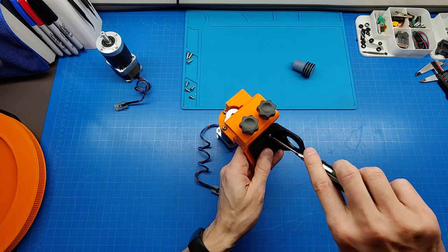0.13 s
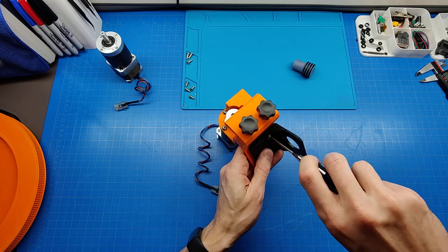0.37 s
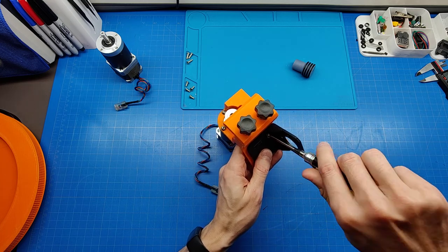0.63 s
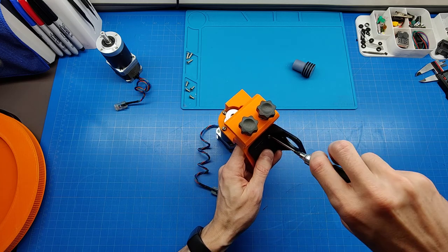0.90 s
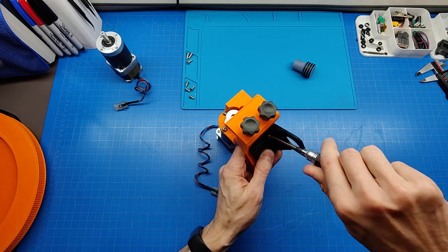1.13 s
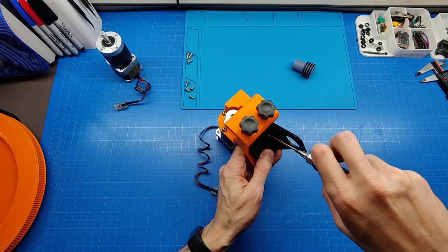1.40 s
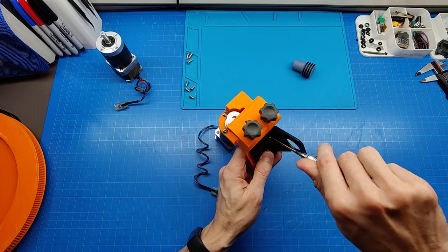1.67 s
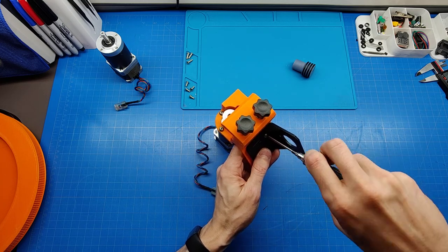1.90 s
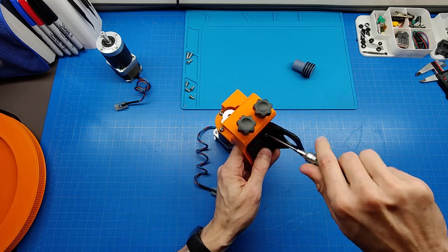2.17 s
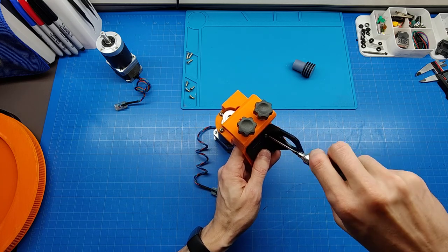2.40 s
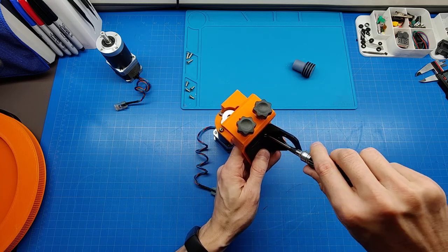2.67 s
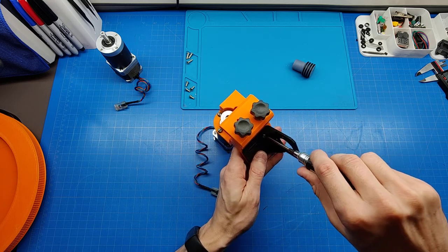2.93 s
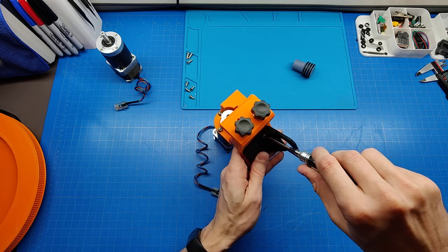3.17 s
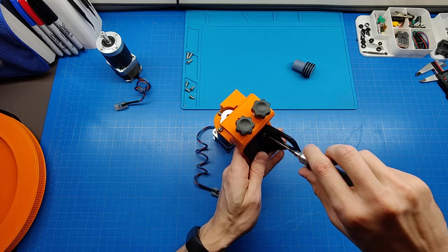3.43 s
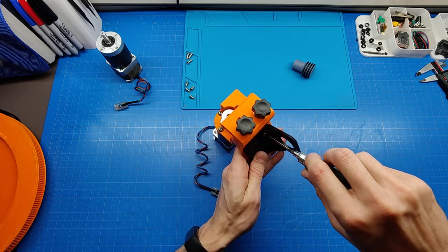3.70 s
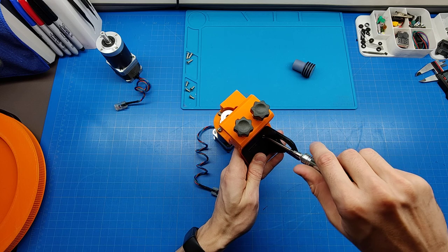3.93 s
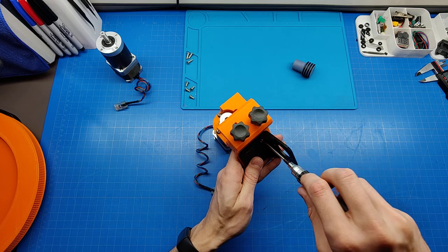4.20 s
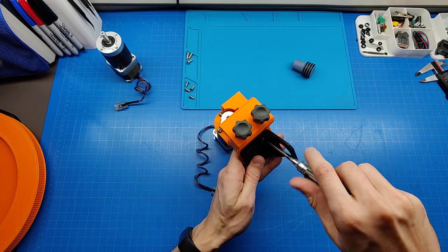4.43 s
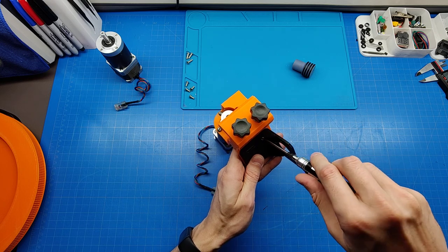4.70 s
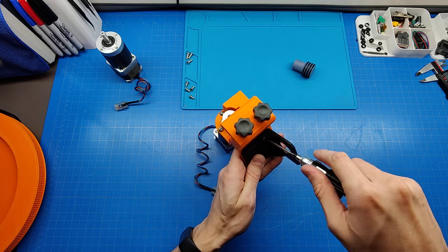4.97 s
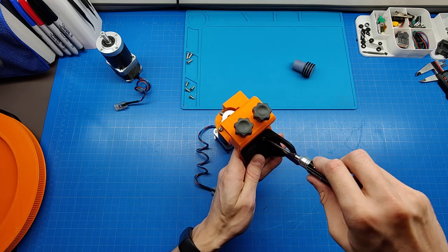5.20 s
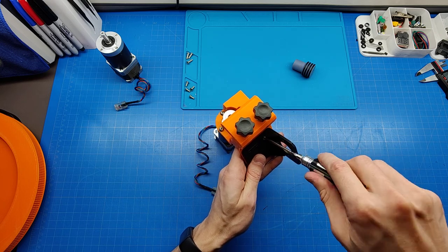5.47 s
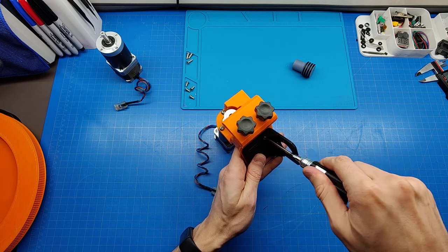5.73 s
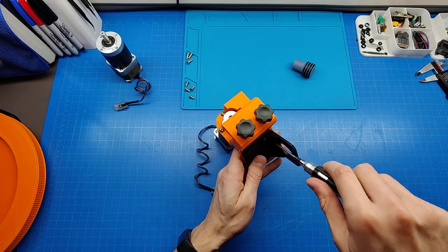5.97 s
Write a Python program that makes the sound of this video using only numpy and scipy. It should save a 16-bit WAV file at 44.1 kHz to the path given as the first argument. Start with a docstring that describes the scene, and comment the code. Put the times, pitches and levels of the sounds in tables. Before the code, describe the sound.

Tiny gritty ticks of a driver bit ring briefly through hollow plastic, mixed with very faint finger rubbing and dry skin hiss. An early snap leans left and stands out; the heaviest muffled bench thumps follow at about two seconds. The rest is calmer, scattered clicking, ending on two brighter clicks. Stereo microphone clamped to the bench, short room reflections, faint low room tone.

```python
"""A small screwdriver turns screws into a plastic part held on a workbench: its bit clicks in the screw head,
each click a burst of chatter ringing through the plastic. The part knocks on the bench top and sets its modes
swinging; fingers rub the plastic as noise through the same rings, and dry skin hisses on the handle.
A small quiet room answers with sparse fading taps, over a faint tone of its own.
A two-capsule microphone is clamped to the bench."""
import sys
import numpy as np
from scipy import signal
from scipy.io import wavfile
from scipy.ndimage import uniform_filter1d

SR = 44100
rng = np.random.default_rng(int(sys.argv[2]) if len(sys.argv) > 2 else 0)


def to_linear_factor(level_db):
    """Convert decibel levels (scalar or array-like) to linear amplitude factors."""
    exponent = np.asarray(level_db, float) / 20
    return 10 ** exponent


def inscribe(sig):
    """Save sig as 16-bit PCM at rate SR to the path in sys.argv[1].

    A 1-D sig is mono; a 2-D sig holds one channel per row.
    Samples are clipped to [-1, 1] before scaling.
    """
    pcm = np.round(np.clip(np.atleast_2d(sig).T, -1, 1) * 32767)
    wavfile.write(sys.argv[1], SR, pcm.astype(np.int16))


N = 269010  # length [samples]

# Turns of the driver, fingers rubbing the plastic and pressing the part on the bench:
# (time of most effort [s], half length [s], rub level [dB], bright level against rub [dB], press level [dB])
STROKES = [(0.0, 0.084, -59.5, 5, -48.5), (0.213, 0.26, -86, 6, -53), (0.384, 0.12, -79.5, 6.5, -64),
           (0.77, 0.32, -77.5, 0, -58.5), (1.294, .1, -62, -2, -45), (1.444, 0.2, -73, -4, -61),
           (1.68, 0.2, -80.5, 7, -60), (1.806, .12, -70, -1, -65), (2.033, 0.094, -62, -6, -48),
           (2.22, 0.23, -62.5, -4, -39), (2.35, 0.12, -67, -4, -66), (2.44, 0.23, -65.5, -12, -53.5),
           (3.041, 0.11, -63, -9, -51), (3.2, 0.083, -71, -10, -47), (3.296, 0.098, -66.5, -15.5, -52),
           (3.634, 0.16, -98, -15, -66), (3.732, 0.26, -76, -5.5, -60), (4.307, 0.4, -82, -0.5, -62.5),
           (4.42, 0.15, -74, -1, -68), (4.762, 0.17, -72.5, -2.5, -55.5), (5.304, 0.069, -70.5, -12, -49),
           (6.065, .15, -75.5, -5.5, -58)]
# Dry skin sliding on the handle: (time of most hiss [s], half length [s], level [dB])
SKIN_SLIDES = [(0.0, 0.054, -62.5), (0.284, .06, -71), (0.412, .06, -67), (0.72, .07, -72),
               (0.93, .05, -75), (1.25, 0.069, -62), (1.44, .06, -81), (1.73, 0.091, -65), (1.86, .06, -77),
               (1.998, .06, -62), (2.16, .06, -65), (2.21, .08, -63), (2.76, .08, -72), (3.01, .06, -71),
               (5.33, 0.077, -73), (6.0, .06, -68)]
# Rings of the plastic part, in body, wall, bright and top groups:
# (centre [Hz], width between the -9 dB points [Hz], level [dB])
PART_RINGS = [
    [(900, 1100, -5), (1310, 233, -0.5), (2434, 2330, 4)],
    [(3610, 1700, 1.5), (4256, 2400, 9), (5240, 3200, 4.5)],
    [(6970, 2000, -3.5), (7414, 2020, -5), (9670, 1680, -15)],
    [(13450, 3500, 10), (16140, 4570, 7.5), (10300, 3400, 9.5)],
]
# Narrow rings that rubbing favours, in the same four groups: (centre [Hz], width [Hz], level [dB])
RUB_RINGS = [
    [(2300, 500, 7)],
    [(4210, 550, 13.5)],
    [],
    [],
]
# The part knocking on the bench; levels add to that of the strongest mode in each bench group:
# (time [s], boom level [dB], middle level against boom [dB], upper level against boom [dB])
KNOCKS = [(0.004, -54.5, 3.5, -15), (0.043, -46.5, -6.5, -19), (0.137, -42.5, -16, -18),
          (0.199, -62.5, -9, 12.5), (0.237, -59.5, 9.5, -20), (0.397, -51, -13, -3), (0.557, -55, -11, -44),
          (0.749, -52, -1.5, -1), (0.797, -41, -7.5, -11.5), (0.848, -48, -11, -9),
          (0.964, -49, -21, -18.5), (1.06, -49, -10, -15.5), (1.232, -38.5, 4, 7),
          (1.304, -36.5, -14, -8.5), (1.431, -51.5, 0.5, -6), (1.458, -36, -18, -23),
          (1.602, -34, -14.5, -20.5), (1.711, -53, -0.5, 1), (1.743, -29, -11, -20),
          (1.788, -37.5, -13.5, -18.5), (1.826, -44, -3.5, -8.5), (1.981, -19, -4.5, -10),
          (2.039, -23, -6, -10), (2.086, -44.5, -2, 0.5), (2.178, -24, -8.5, -14.5),
          (2.221, -34.5, -3.5, -10.5), (2.3, -36, -11.5, -8), (2.349, -55.5, -4.5, 2),
          (2.422, -42, -34, -11), (2.582, -35, -21, -18.5), (2.94, -45.5, -17, -30),
          (2.975, -37.5, -7.5, -8.5), (2.997, -44, -4.5, -2.5), (3.049, -58, -11, 0),
          (3.181, -32.5, -12, -29), (3.216, -45, -11, -6), (3.27, -45, -5, -6.5), (3.309, -59, 10.5, 5.5),
          (3.578, -67, 2, -22), (3.697, -40, -20, -17.5), (3.758, -57.5, -35, -4),
          (3.846, -52.5, -4.5, -19.5), (3.943, -51, -27, -14), (4.203, -50.5, -7, -8.5),
          (4.27, -58.5, -7.5, -0.5), (4.372, -52, -29, -13), (4.72, -51.5, -23, -17),
          (4.742, -38.5, -32, -17.5), (4.807, -49, -15.5, -5.5), (4.884, -46.5, -19.5, -20.5),
          (5.1, -49.5, -35, -23), (5.148, -56, -37, -31), (5.245, -43.5, -30, -34),
          (5.31, -28.5, -12, -23.5), (5.991, -51, -12, -21), (6.063, -40.5, -33, -38)]
# Bench-top modes before detuning, in boom, middle and upper groups: (frequency [Hz], level [dB], t60 [s])
BENCH_MODES = [
    [(38.7, -16.5, 0.36), (57, -18.5, .15), (88.4, -4, 0.079), (111, 1, 0.2), (120.6, 0.5, 0.087),
     (163.5, -5, 0.2), (192.8, -13.5, 0.17)],
    [(249.6, 3.5, 0.17), (222.5, -13, 0.25), (303.4, -11.5, 0.22)],
    [(395.5, -2.5, 0.2), (460, 2.5, 0.11), (554, -5.5, 0.15), (667, -18.5, 0.194), (853, -24.5, 0.19),
     (1055, -13, 0.038), (1296, -31, 0.11), (1611, -24, 0.1)],
]
# Spectrum of the room tone, only its shape: (frequency [Hz], relative level per Hz [dB])
ROOM_TONE = [(15, -35), (25, 0.5), (172, -0.5), (220, -13), (280, -4.5), (524, -6), (651, -13.5),
             (809, -11.5), (1150, -18.5), (1830, -19), (5570, -39.5), (7510, -32), (8830, -34),
             (15200, -25.5), (16500, -26.5)]
# Left-right likeness of the room tone: (frequency [Hz], correlation [0 to 1])
TONE_LIKENESS = [(60, 0.99), (180, 0.96), (550, 0.9), (1650, 0.063), (4970, 0.072), (15000, 0.23)]
# Bit clicking in the screw head; levels add to that of the strongest ring in each part group:
# (time [s], bright level [dB], body level against it [dB], pitch of the spot hit [Hz], top level against it [dB])
CLICKS = [(0.0044, -44, -12.5, 1650, -21), (0.0367, -54, -6, 2600, -30), (0.1685, -65.5, 8, 2200, -32),
          (0.197, -61, 1, 2200, -35), (0.2335, -67, 8, 2400, -27), (0.2752, -39.5, -20.5, 2380, -13.5),
          (0.398, -38, -12.5, 2150, -16.5), (0.401, -60.5, 10.5, 4750, -20), (0.545, -47.5, -38, 1230, -33),
          (0.5738, -46, -23, 2710, -31), (0.68, -48, -28, 2850, -29), (0.6973, -46, -17, 1710, -21),
          (0.7453, -47, -16.5, 2720, -25), (0.7901, -48.5, -15, 1820, -31), (0.811, -57, -6, 2140, -28),
          (0.8254, -54.5, -5.5, 2050, -27), (0.8737, -46.5, -19, 1550, -21), (0.8955, -45, -18, 1700, -23),
          (0.9096, -49.5, -20.5, 1320, -16.5), (1.074, -48.5, -19, 1800, -20), (1.1, -50, -13.5, 2550, -22),
          (1.2308, -34, -8, 2300, -4.5), (1.2327, -18, -19, 1310, -28), (1.2376, -25, -16.5, 806, -22),
          (1.369, -48.5, -7.5, 2060, -33), (1.416, -47.5, -10, 2900, -26),
          (1.4317, -37.5, -14.5, 2180, -22), (1.478, -57, 4.5, 2290, -48), (1.586, -39, -17, 2360, -40),
          (1.6092, -51, -10, 1310, -24), (1.6716, -52, -27, 1990, -29), (1.698, -63, 4, 2110, -7),
          (1.736, -44, -18, 1120, -5.5), (1.7515, -44, -9, 4530, -20), (1.798, -39.5, -15, 2650, -12),
          (1.8293, -43, -7, 2840, -22), (1.8498, -34.5, -13, 3550, -17), (1.9825, -43, -7, 1170, -23),
          (1.9909, -34, -10, 2220, -18), (2.0404, -42.5, -8, 1050, -34), (2.0815, -60.5, 9, 2050, -22),
          (2.1093, -34.5, -14.5, 3580, -22), (2.149, -38.5, -24, 2200, -13.5),
          (2.178, -48.5, -1, 2120, -29), (2.1996, -34, -13.5, 1350, -18.5), (2.3, -46.5, -5.5, 2070, -23),
          (2.3221, -42, -6, 2460, -21), (2.3496, -46, -4, 2510, -16), (2.4542, -58, -5.5, 2260, -24),
          (2.4932, -39.5, -12.5, 2470, -25), (2.5448, -54.5, -20, 2225, -20), (2.5765, -52, -17, 2350, -37),
          (2.465, -60.5, 5, 3670, -30), (2.6052, -66.5, 5.5, 2205, -30), (2.7367, -69.5, 0.5, 1770, 1),
          (2.763, -56, -14.5, 1320, -14), (2.802, -54, -3, 2330, -11), (2.886, -52, -32, 1540, -19),
          (2.9107, -52, -22, 1690, -33), (2.9651, -56, 3, 2330, -37), (2.9724, -53, 6, 2430, -33.5),
          (2.9916, -36, -4.5, 2230, -23), (3.1633, -66, 10, 2400, -32), (3.2111, -46.5, 0.5, 2547, -29),
          (3.2202, -48.5, 0, 1720, -39), (3.2852, -47.5, -2, 2520, -24), (3.2946, -50, -5.5, 2170, -23.5),
          (3.5584, -40, -23.5, 1275, -21.5), (3.6527, -47.5, -23, 1290, -19),
          (3.685, -41, -16.5, 2440, -13.5), (3.7437, -66, 8.5, 2340, -32), (4.1387, -45, -20.5, 1830, -20),
          (4.156, -52.5, -5.5, 2300, -32), (4.2037, -46.5, -8, 3040, -16.5), (4.2124, -53.5, -7, 2630, -17),
          (4.2782, -48, -13, 2800, -15), (4.356, -43.5, -9, 1260, -41), (4.3737, -43, -19, 1290, -25),
          (4.405, -55, -6, 2690, -16), (4.437, -58, -7.5, 2440, -37), (4.5516, -49, -15.5, 2050, -33),
          (4.6853, -53.5, -12.5, 2470, -25), (4.759, -44, -7, 2560, -23), (4.812, -59, -3.5, 2550, -26),
          (4.8948, -67, 9.5, 2540, -22), (4.947, -67.5, 3, 2310, -40.5), (5.137, -44, -19.5, 3100, -27),
          (5.1552, -35.5, -21.5, 1720, -34), (5.2608, -39.5, -18.5, 1840, -24),
          (5.2853, -44.5, -12.5, 2080, -18), (5.3106, -61, 8, 2500, -8), (5.3259, -42, -11.5, 5380, -11),
          (5.985, -28, -30, 2400, -22), (6.065, -32.5, -25, 3100, -18)]
# The hand shading one capsule or the other from the bright part: (time [s], left over right [dB])
HAND_SHADE = [(0.0, 0.), (0.68, -2), (1.17, 1), (1.26, 13.5), (1.51, 0.), (1.6, -8), (1.8, -2), (2.36, -.5),
              (5.05, 1), (5.18, 8.5), (5.3, 2.5), (6.1, -2)]
# Decay of the room: (frequency [Hz], t60 [s])
ROOM_DECAY = [(200, 0.18), (700, 0.34), (2500, 0.29), (7000, 0.3), (14000, 0.24)]


def evened(x):
    """Scales to rms 1."""
    return x / np.sqrt(np.mean(x ** 2) + 1e-20)


def read(points, hz):
    """Reads a spectrum on a log frequency axis."""
    f, value = np.transpose(points)
    return np.interp(np.log(hz + 1), np.log(f + 1), value)


def add(mix, s, sound):
    """Mixes a sound in at s seconds."""
    part = mix[..., max(round(s * SR), 0):][..., :sound.shape[-1]]
    part += sound[..., :part.shape[-1]]


def efforts(at_s, peak_db, rise_db_per_s, fall_db_per_s, rest_db):
    """Gain for every sample: peaks with straight flanks in dB, their powers added to a resting level."""
    t = np.arange(0, N + 64, 64) / SR
    late = t - np.reshape(at_s, (-1, 1))
    flank_db = np.where(late > 0, late * np.c_[fall_db_per_s], -late * np.c_[rise_db_per_s])
    power = to_linear_factor(2 * (np.c_[peak_db] - flank_db)).sum(0) + to_linear_factor(2 * rest_db)
    return np.interp(np.arange(N) / SR, t, np.sqrt(power))


def strokes(peak_db, rest_db):
    """The strokes' common swell and fade, at the given peak levels."""
    s, half = np.transpose(STROKES)[:2]
    rise_db, fall_db = 16.5, 16.5  # change over a half length
    return efforts(s, peak_db, rise_db / half, fall_db / half, rest_db)


def ring(x, modes, size=2048):
    """Passes x through the resonances: their powers add, and the phase is the causal minimum one."""
    hz = abs(np.fft.fftfreq(size, 1 / SR))
    power = sum(to_linear_factor(2 * db) / (1 + (2 * (hz - centre_hz) / width) ** 2) ** 3
                for centre_hz, width, db in modes)
    spectrum = np.exp(np.conj(signal.hilbert(np.log(power) / 2)))
    taps = np.fft.ifft(spectrum).real
    return signal.oaconvolve(x, taps[:size // 2])[:len(x)]


def slip_grip(slips_per_s=300, spread_db=4.5):
    """Skin sticks and lets go in tiny slips of uneven size, at random moments."""
    size = to_linear_factor(spread_db * np.minimum(rng.exponential(1, N), 3))
    slips = size * (rng.random(N) < slips_per_s / SR)
    return evened(uniform_filter1d(slips, 30))  # each slip lasts under a millisecond


def skin_slide():
    """Level of dry skin sliding on the handle: quick swells that fade more slowly."""
    s, half, db = np.transpose(SKIN_SLIDES)
    return efforts(s, db, 40 / half, 18 / half, -92)  # 40 dB up, 18 dB down over a half length


def rub():
    """Slips roughen a fine hiss that rings the part; the top group, skin on the handle, is mostly hiss."""
    grip = slip_grip()
    rub_db, bright_db = np.transpose(STROKES)[2:4]
    rest_db = -94.0
    wall_db = rub_db - 4 - 0.18 * bright_db  # dull strokes carry more of the wall group
    levels = [strokes(rub_db, rest_db), strokes(wall_db, rest_db),
              strokes(rub_db + bright_db, rest_db), skin_slide()]
    roughness = (1.6, 1.5, 0.9, 0.4)
    out = []
    for level, modes, favoured, rough in zip(levels, PART_RINGS, RUB_RINGS, roughness):
        hiss = (1 + rough * grip) * rng.standard_normal(N)
        out.append(level * evened(ring(hiss, modes + favoured)))
    return np.array(out)


def bench_swings(modes, rise_s, wait, strength, detune=0.034):
    """Soft pushes into one group of bench modes, each decaying and bouncing once; one row per push."""
    t = np.arange(SR // 3) / SR
    hz, db, t60 = np.transpose(modes)[:, None, :, None]
    # where a knock lands and how the hands lean shift the modes a little
    shift = rng.standard_normal((len(wait), len(modes), 1))
    decay = to_linear_factor(db - 60 * t / t60)
    swing = (decay * np.sin(2 * np.pi * hz * (1 + detune * shift) * t)).sum(1)
    swing *= (1 - np.exp(-t / rise_s)) ** 2  # the rubber mat softens the landing
    swing += [size * np.r_[np.zeros(late), one[:-late]] for one, late, size in zip(swing, wait, strength)]
    return swing * to_linear_factor(db.max()) / abs(swing).max(1, keepdims=True)


def hand_press(lumps, swing):
    """Lumpy noise from the pressing hands stirs the bench modes, swelling with each stroke."""
    press = strokes(np.transpose(STROKES)[4], -77.5)
    return press * evened(signal.fftconvolve(lumps, swing)[:N])


def bench():
    """Knocks and pressing hands set the bench top swinging, in boom, middle and upper groups."""
    unevenness = evened(uniform_filter1d(rng.standard_normal(N), 900))
    lumps = rng.standard_normal(N) * to_linear_factor(2.4 * unevenness)
    pushes = len(KNOCKS) + 1  # the last one serves the pressing hands
    # the part bounces once more on its other edge
    wait = (SR * (0.007783 + 0.01591 * rng.random(pushes))).astype(int)
    strength = 0.17 + 0.57 * rng.random(pushes)
    rises_s, press_dbs = (0.005, 0.003, 0.002), (-3.0, -8.0, -12.0)
    out = np.zeros((3, N))
    for k, (modes, rise_s, press_db) in enumerate(zip(BENCH_MODES, rises_s, press_dbs)):
        swings = bench_swings(modes, rise_s, wait, strength)
        for (s, boom_db, *above_db), swing in zip(KNOCKS, swings):
            add(out[k], s, to_linear_factor(boom_db + [0, *above_db][k]) * swing)
        out[k] += to_linear_factor(press_db) * hand_press(lumps, swings[-1])
    return out


def room_tone():
    """The quiet room's own tone: random short-time spectra with faint patches, most alike at the bottom."""
    frames, hz = N // 256 + 5, np.fft.rfftfreq(1024, 1 / SR)
    a, b, c, d, patches = rng.standard_normal((frames, 513, 5)).T
    patches = uniform_filter1d(patches, 12, 0)  # along frequency
    patches = evened(uniform_filter1d(patches, 14, 1))  # along time
    same = read(TONE_LIKENESS, hz)[:, None]
    left = a + 1j * b
    right = same * left + np.sqrt(1 - same ** 2) * (c + 1j * d)
    spectra = np.array([left, right]) * to_linear_factor(read(ROOM_TONE, hz)[:, None] + 1.5 * patches)
    tone = signal.istft(spectra, nperseg=1024, noverlap=768)[1][:, :N]
    return to_linear_factor(-66) * evened(tone)


def click_force(lumpy, body_db, steel_s=0.0024, plastic_s=0.0054):
    """Gritty swell and decay of a click: short for steel on steel, longer where plastic leads."""
    t = np.arange(len(lumpy)) / SR
    length = steel_s + plastic_s * min(to_linear_factor(body_db), 1)
    grit = to_linear_factor(3.5 * evened(uniform_filter1d(lumpy, 40)))
    return grit * np.exp(-t / length) * (1 - np.exp(-t / (0.46 * length)))


def clicks(pitch_share=0.15, pitch_db=14.0):
    """The bit jumps in the screw head: a few milliseconds of chatter ring the four groups of the part."""
    noise = rng.standard_normal((len(CLICKS), 5, 2048))
    ring_db = np.array([max(mode[2] for mode in modes) for modes in PART_RINGS])
    out = np.zeros((4, N))
    for (s, db, body_db, body_hz, top_db), (lumpy, *chatters) in zip(CLICKS, noise):
        force = click_force(lumpy, body_db)
        # the wall that is hit adds its own pitch to the body
        own_pitch = (body_hz, pitch_share * body_hz, pitch_db)
        groups = [PART_RINGS[0] + [own_pitch]] + PART_RINGS[1:]
        rung = np.array([ring(force * chatter, modes) for chatter, modes in zip(chatters, groups)])
        wall_db = -7 + 0.58 * body_db + 0.16 * top_db  # the wall lies between body and top
        peak_db = db + np.array([body_db, wall_db, 0, top_db]) + ring_db
        add(out, s - 0.001, rung * (to_linear_factor(peak_db) / abs(rung).max(1))[:, None])  # starts 1 ms early
    return out


def hand_shade():
    """The hand's shadow on the bright part: a gain for the left capsule and its inverse for the right."""
    s, db = np.transpose(HAND_SHADE)
    left = to_linear_factor(np.interp(np.arange(N) / SR, s, db) / 2)
    return np.array([left, 1 / left])


def room_tail():
    """Sparse random echoes, half a second long, that die at each frequency's own rate."""
    taps = np.zeros((2, SR // 2))
    starts = np.arange(120, SR // 2 - 20, 20)
    at = starts + rng.integers(0, 20, (2, len(starts)))
    np.put_along_axis(taps, at, rng.choice([-1.0, 1.0], at.shape), 1)
    taps[1] += 0.11 * taps[0]  # the two capsules sit close together
    hz, t, z = signal.stft(taps, SR, nperseg=128)
    decay = to_linear_factor(-60 * t / read(ROOM_DECAY, hz)[:, None])
    tail = signal.istft(z * decay, SR, nperseg=128)[1]
    return tail / np.linalg.norm(tail, axis=1, keepdims=True)


def room(x, count=3):
    """The room's answer: rotating between tails keeps alike clicks from ringing alike."""
    out = np.zeros((2, N))
    turn = np.arange(N) / SR * 31  # half cycles of the rotation, 31 a second
    for k in range(count):
        share = np.sqrt(2 / count) * abs(np.cos(np.pi * (turn + k / count)))
        out += signal.fftconvolve(x * share, room_tail(), axes=1)[:, :N]
    return out


def scene():
    """The bench reaches both capsules alike through the clamp; clicks and rubbing come through the air."""
    body, wall, bright, top = rub() + clicks()
    boom, middle, upper = bench()
    near = body + wall + bright * hand_shade()
    near[1] = np.roll(near[1], 1)  # the left capsule is a few millimetres nearer
    near = near + top
    into_room = near + to_linear_factor(-16.5) * middle + to_linear_factor(-10.5) * upper + to_linear_factor(-30.0) * boom
    return boom + middle + upper + near + to_linear_factor(-1.5) * room(into_room) + room_tone()


def band_limit(x):
    """A steep low-pass at the top of the band."""
    return signal.sosfilt(signal.butter(12, 16660, fs=SR, output="sos"), x)


def record(dry):
    """The microphone's band: a low cut at 42 Hz and a steep treble limit at 16 kHz."""
    low_cut = signal.butter(2, 42, "high", fs=SR, output="sos")
    treble_limit = signal.firwin(255, 16000, window=("kaiser", 7), fs=SR)
    mix = signal.sosfilt(low_cut, dry)
    mix = signal.oaconvolve(mix, treble_limit[None], "same")
    return band_limit(mix)


dry = scene()
out = record(dry)
inscribe(out)
```